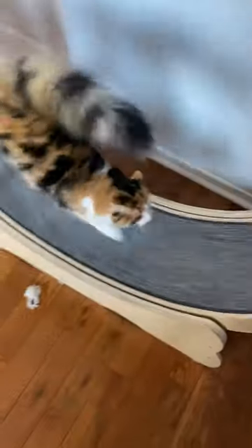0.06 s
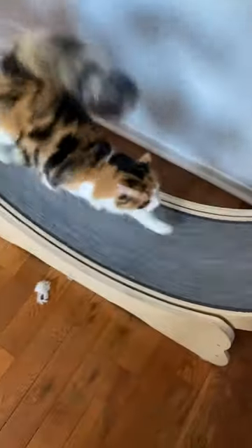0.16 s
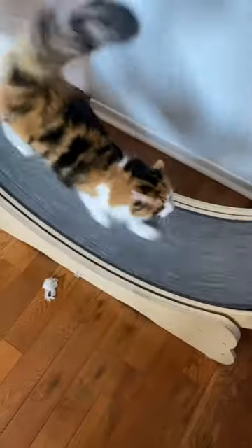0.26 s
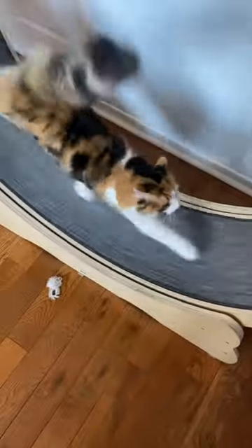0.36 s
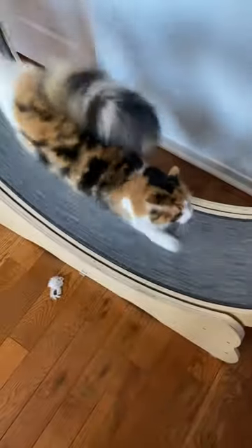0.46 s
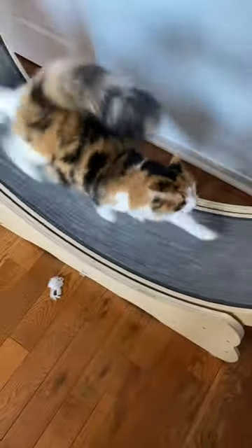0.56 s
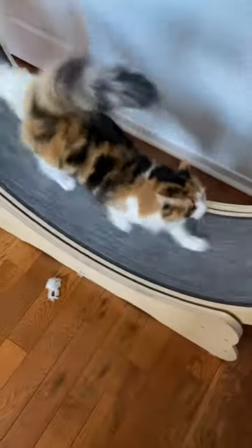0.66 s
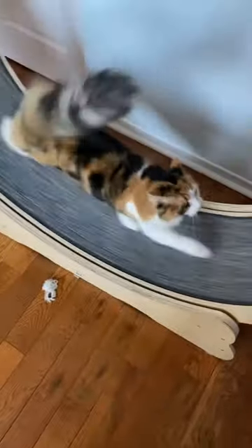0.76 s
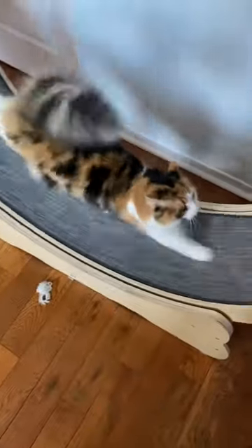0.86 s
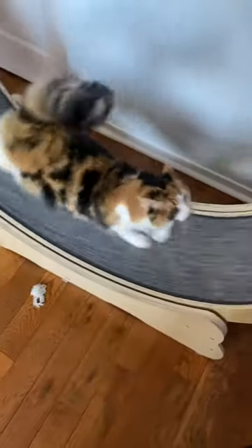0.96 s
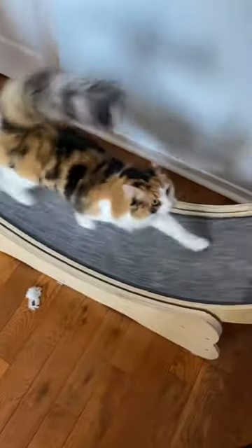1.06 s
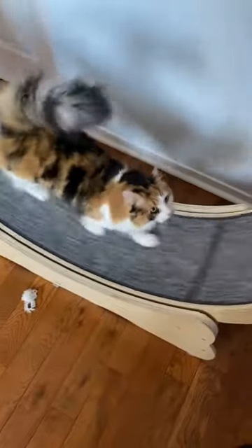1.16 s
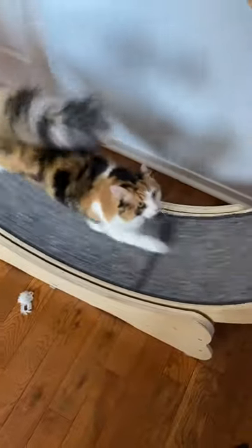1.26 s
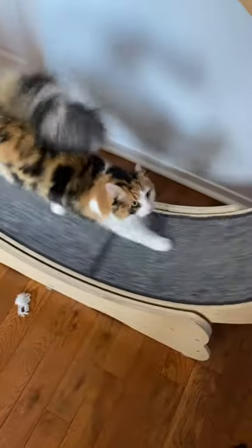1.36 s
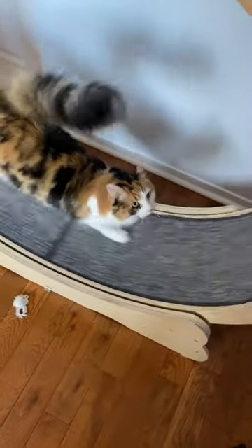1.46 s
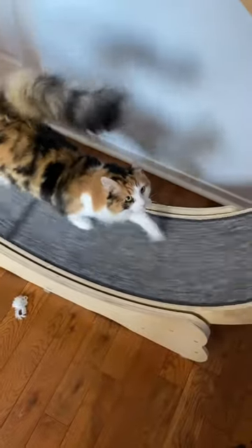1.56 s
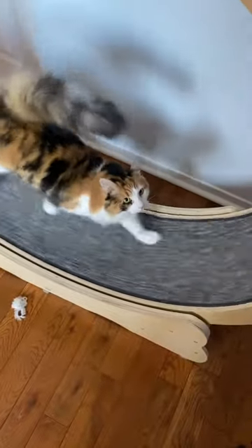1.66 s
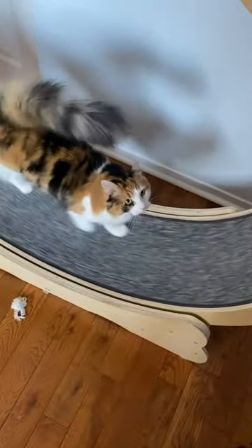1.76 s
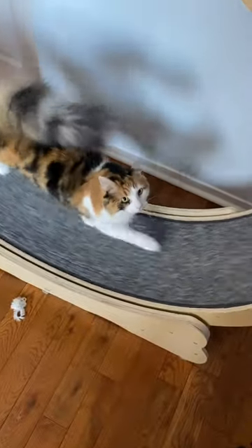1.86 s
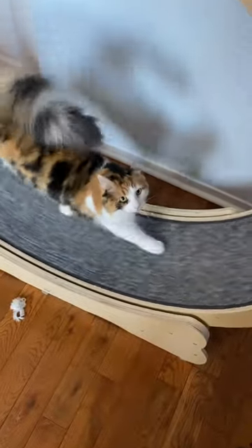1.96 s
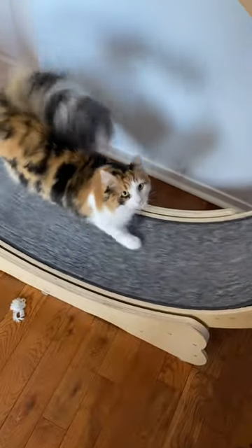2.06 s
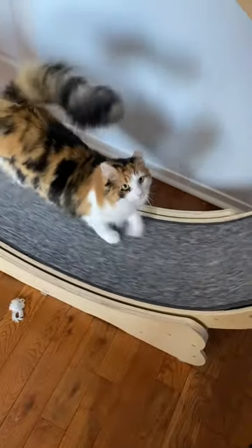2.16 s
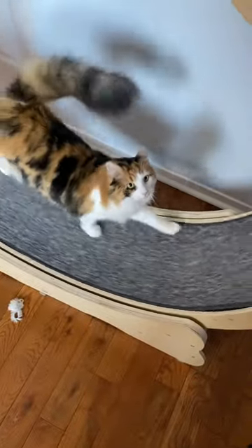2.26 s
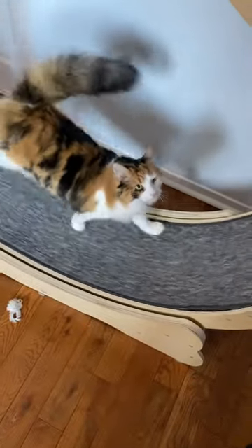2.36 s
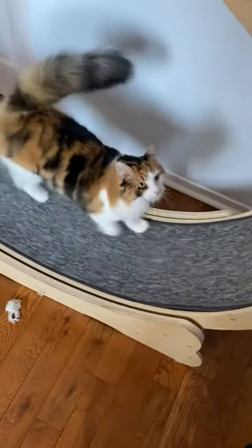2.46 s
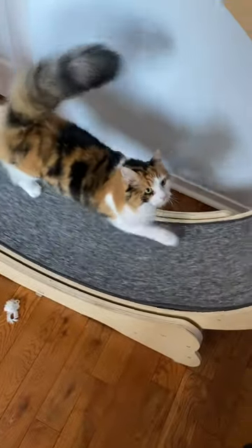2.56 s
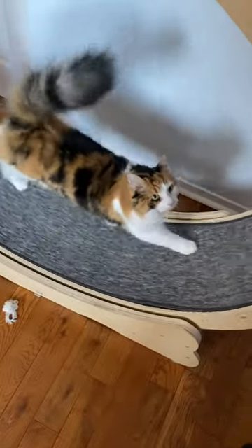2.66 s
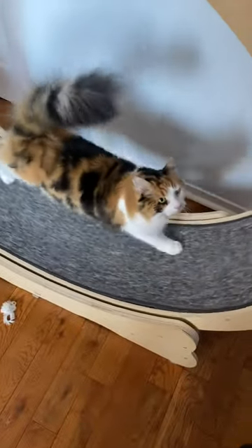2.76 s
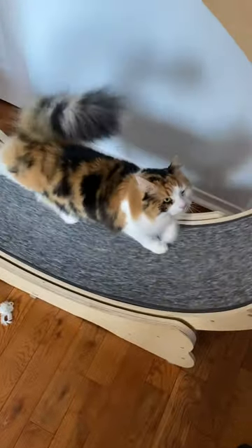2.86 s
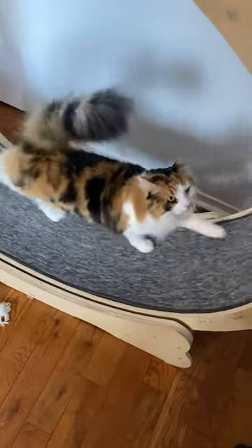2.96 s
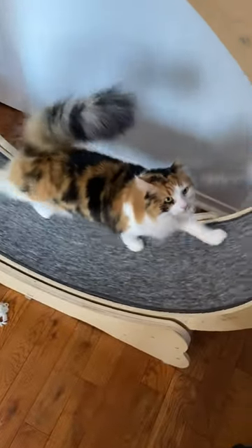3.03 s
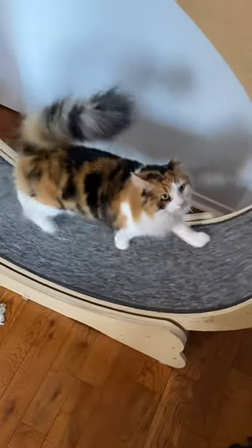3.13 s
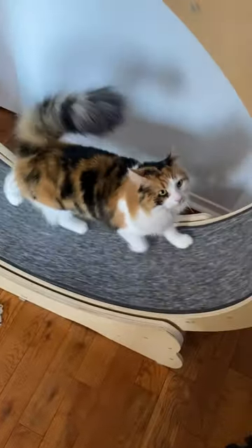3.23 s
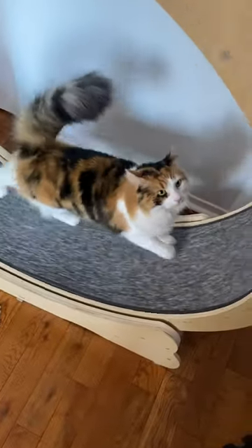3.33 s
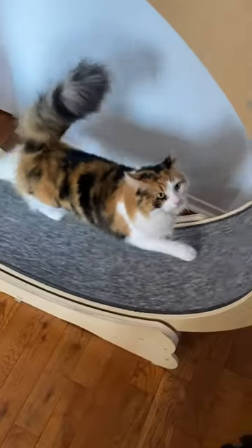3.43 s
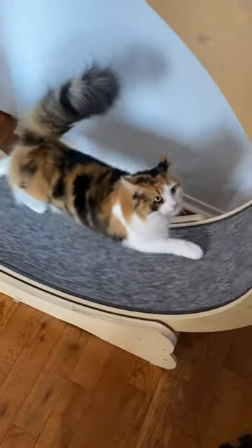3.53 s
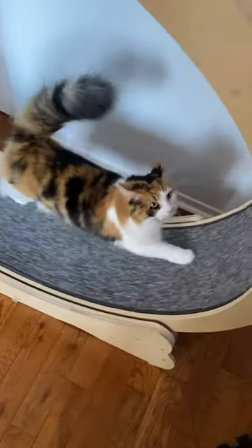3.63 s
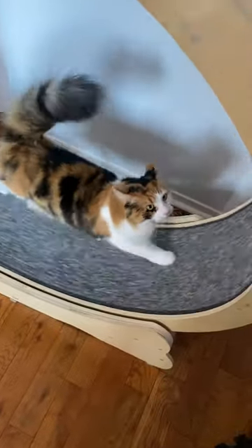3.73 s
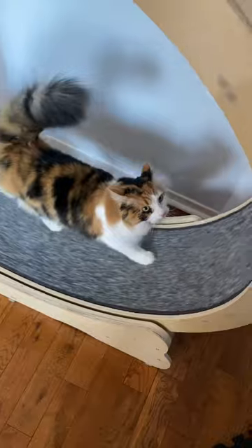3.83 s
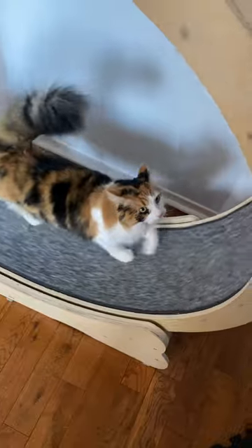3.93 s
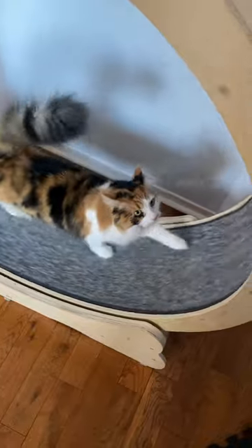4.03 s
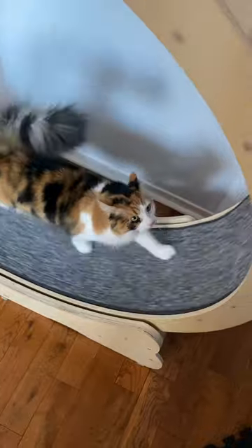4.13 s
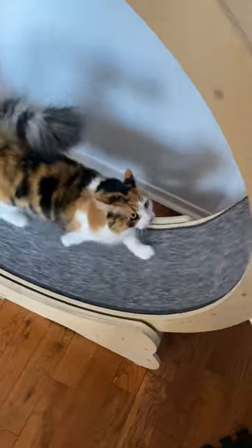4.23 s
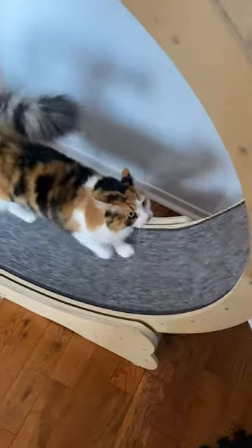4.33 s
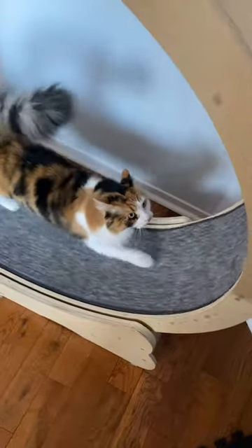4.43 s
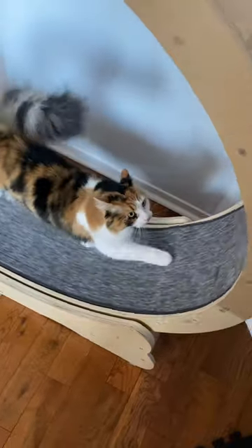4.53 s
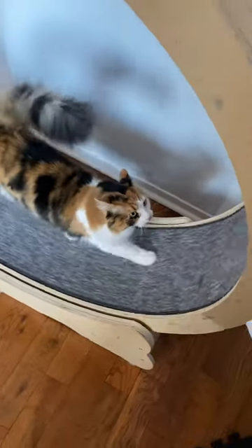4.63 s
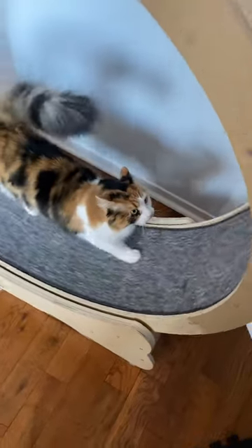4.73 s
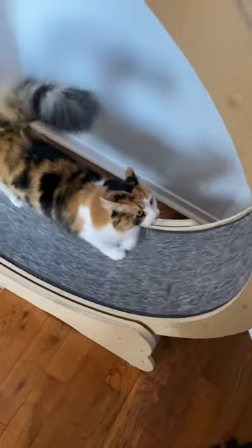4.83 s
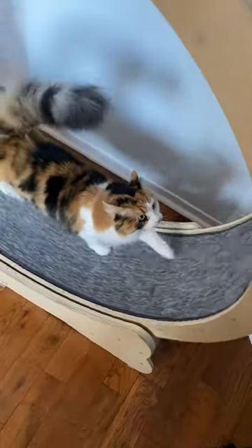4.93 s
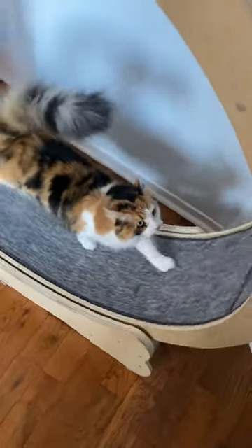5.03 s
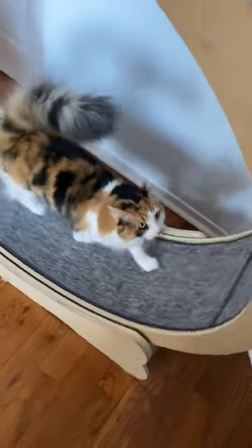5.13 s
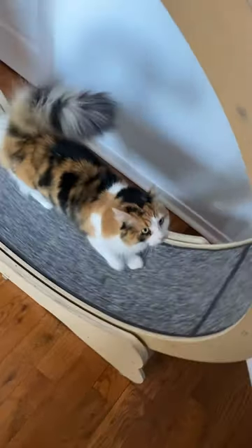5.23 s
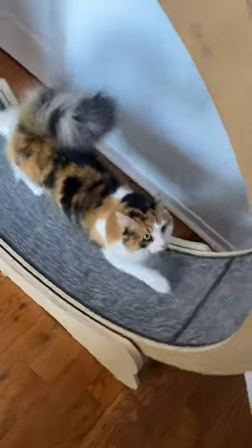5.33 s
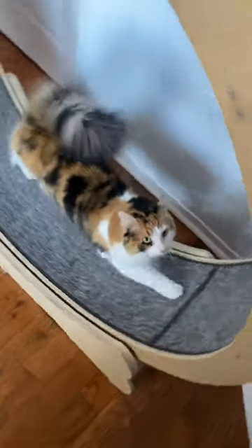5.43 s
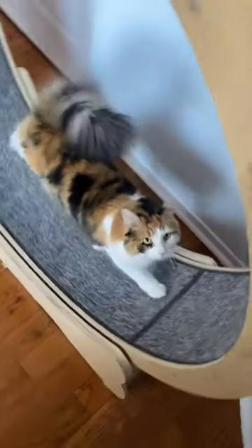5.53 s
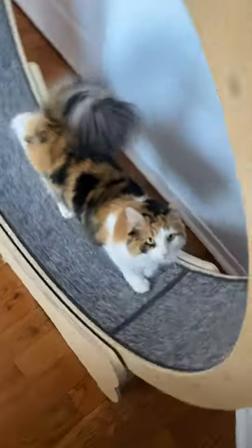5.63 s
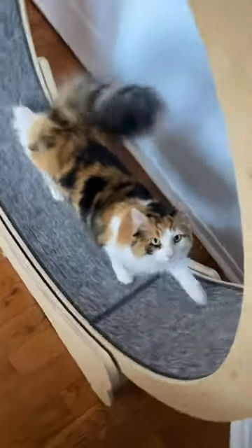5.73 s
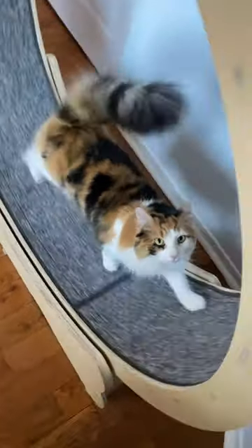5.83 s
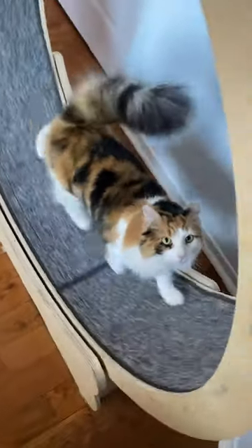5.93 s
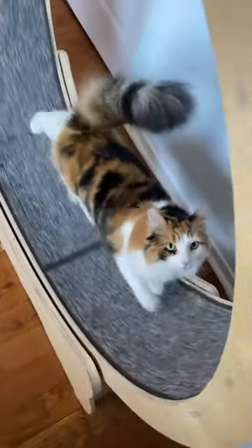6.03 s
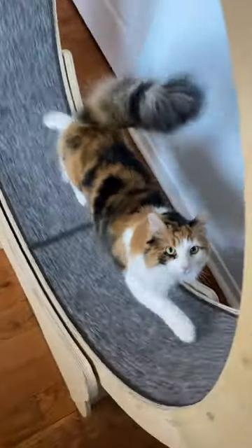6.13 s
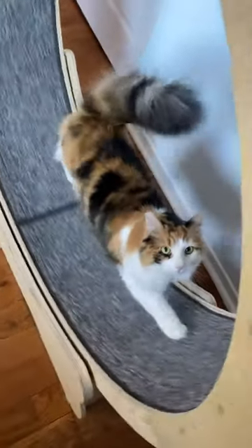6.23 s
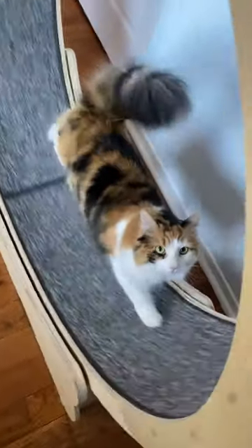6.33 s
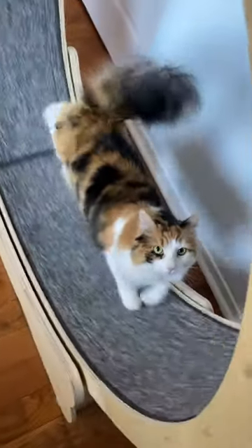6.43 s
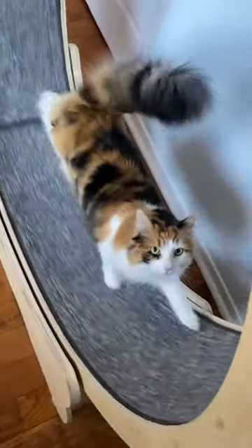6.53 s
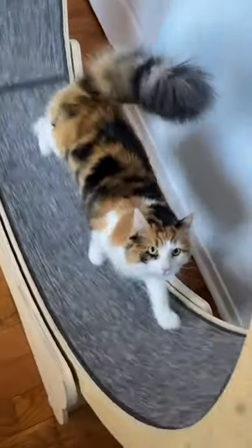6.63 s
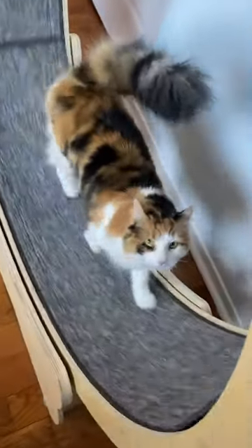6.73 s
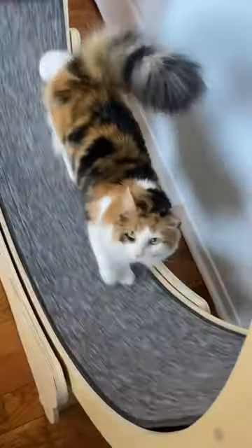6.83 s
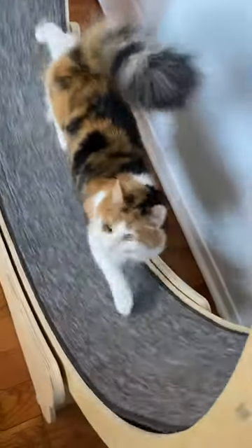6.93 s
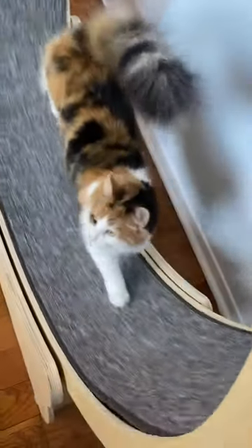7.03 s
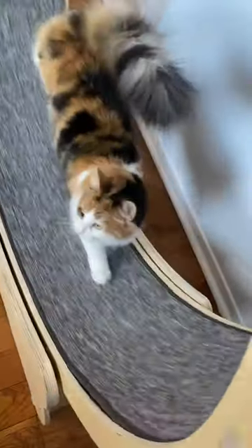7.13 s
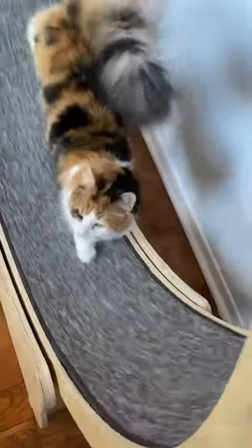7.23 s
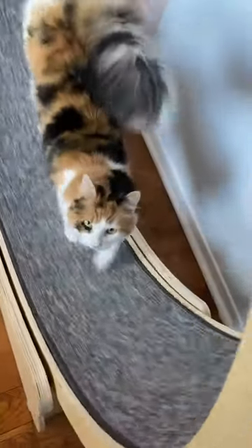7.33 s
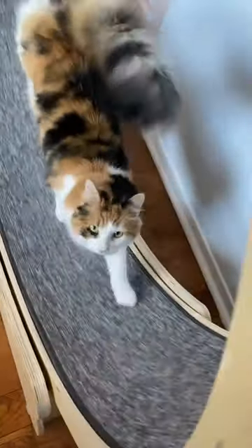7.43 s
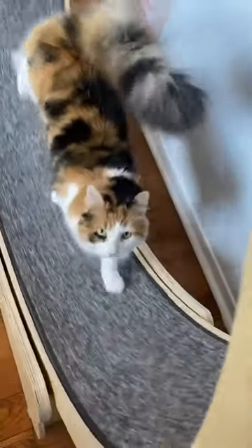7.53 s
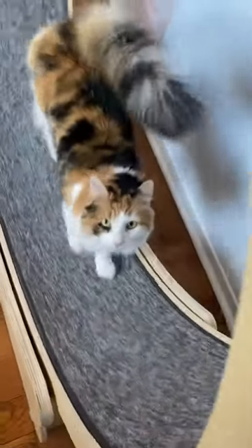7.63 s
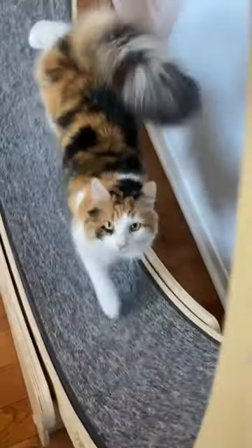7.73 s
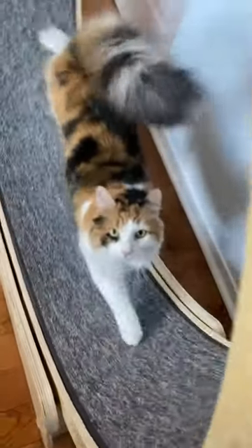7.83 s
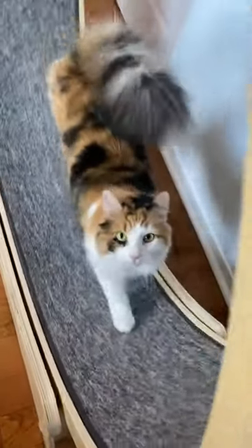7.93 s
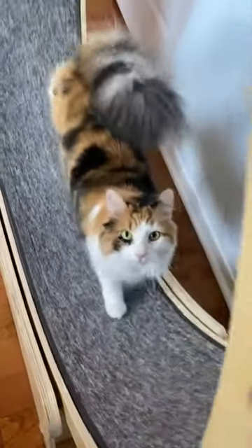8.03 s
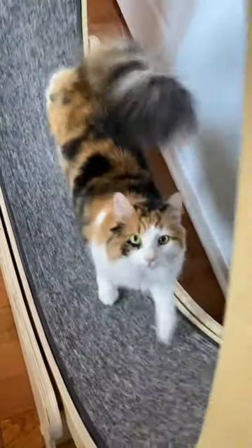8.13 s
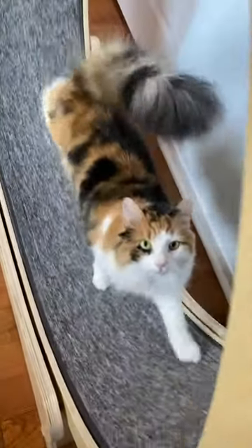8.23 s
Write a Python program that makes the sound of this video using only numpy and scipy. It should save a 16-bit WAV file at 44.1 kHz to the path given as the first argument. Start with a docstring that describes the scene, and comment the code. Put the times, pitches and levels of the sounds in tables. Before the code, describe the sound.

In a small room, close in stereo, a carpeted wooden wheel starts at full speed under a running cat: loud deep rumble, growling rollers, gritty rubbing, rapid padded thumps, short paw rasps and hollow rattling knocks. From about 0.3 s the roll gradually weakens, with strong thumps until 1.4 s, then falls steeply by 2 s. Around 2.4-3.4 s it is nearly still, with only faint rolling, light carpet brushes and small dry claw and wood ticks, clustered near 2.6-2.7 s. From 3.7 s a soft, steady walking roll returns with brushing paws, woody ticks and occasional low thumps, notably near 4.5, 5.3 and 6.1 s. The rumble grows moderately from 6 to 7 s, with rubbing swelling near 7 s and small rasps and faint wavering squeaks until about 7.4 s. A dull thump comes near 7.4 s, then the roll subsides to soft movement and sparse ticks by 8.3 s.

```python
"""A carpeted wooden exercise wheel rumbles as a cat runs in it, slows almost to a stop, then walks on.
The pace sets how loud the rumble, growl, rub and grit of the rim on its rollers are: noise shaped by the frame.
Paws thump (short swings), brush and scrape (bursts of noise) on a carpet that rustles in small grains.
The rim knocks, claws and loose parts tick, and the wood rings on in fading tones.
A close pair of microphone ports hears it all in a small room with a short tail."""
import sys
import numpy as np
from scipy import signal
from scipy.fft import rfft, irfft, next_fast_len
from scipy.io import wavfile
from scipy.ndimage import uniform_filter1d

SR = 44100
rng = np.random.default_rng(int(sys.argv[2]) if len(sys.argv) > 2 else 0)


def persist_wave(psi):
    """Save psi, clipped to +-1, as 16-bit WAV."""
    counts = np.round(np.clip(psi, -1, 1) * 32767).astype(np.int16)
    wavfile.write(sys.argv[1], SR, np.atleast_2d(counts).T)


N = 365148
HZ = np.fft.rfftfreq(N, 1 / SR)
TIME = np.arange(N) / SR
# the stretch of time in which one short sound is built
SHORT_TIME = TIME[:8192]
SHORT_HZ = np.fft.rfftfreq(8192, 1 / SR)


def gain_of(db):
    """Turns decibels into amplitude."""
    return 10 ** (np.asarray(db) / 20)


def evened(x):
    """Scales a sound to an average strength (rms) of 1."""
    return x / np.sqrt(np.mean(x ** 2) + 1e-20)


def packed(db, sound):
    """Sets the strength of a short sound: its rms if all its energy fell into 3 ms."""
    return gain_of(db) * sound / np.sqrt(np.sum(sound[0] ** 2) / (0.003 * SR))


def read(points, hz, axis=1):
    """Reads one column of a table, joined by straight lines over log frequency."""
    columns = np.transpose(points)
    return np.interp(np.log(hz + 1), np.log(columns[0] + 1), columns[axis])


def add(mix, s, sound):
    """Mixes a two-row sound in at time s."""
    part = mix[:, max(round(s * SR), 0):][:, :sound.shape[1]]
    part += sound[:, :part.shape[1]]


def ring(x, colour_db):
    """Filters a sound so that its colour rings after each blow, never before it."""
    log_gain = np.log(gain_of(np.r_[colour_db, colour_db[-2:0:-1]]))
    response = np.exp(np.conj(signal.hilbert(log_gain)))[:len(colour_db)]
    return irfft(rfft(x) * response, x.shape[-1])


def waver(per_s):
    """Wanders smoothly by chance, faster for a larger per_s, with rms 1."""
    return evened(irfft(rfft(rng.standard_normal(N)) * np.exp(-(HZ / per_s) ** 2), N))


def contact(per_s, spread_db, smooth):
    """Makes rolling contact: separate bumps of uneven size over a smooth rush."""
    bumps = rng.random(N) < per_s / SR
    rush = rng.standard_normal((2, N))
    size = rng.standard_normal((2, N))[:, bumps]
    jolts = np.zeros((2, N))
    jolts[:, bumps] = np.sign(size) * gain_of(spread_db * np.minimum(size ** 2, 2.5))
    return evened(evened(jolts) + smooth * rush)


# resonances of wheel and frame: f/Hz, width/Hz, level above the rest/dB
FRAME_RESONANCES = [(46.3, 0.69, 11), (82, 14.8, 6.5), (125, 15, 1.5), (144.1, 9.1, 7), (178.3, 7.3, 5.5),
                    (227.7, 2, 6.5), (296.3, 92, 5.5), (468, 39, 4), (610.5, 7.4, 5), (625, 74, 2.5),
                    (943, 9.1, 6.5), (1890, 19, 7)]


def frame_db(hz):
    """Gives the peaks that wheel and frame put on whatever shakes them."""
    return sum(db / (1 + (2 * (hz - f) / width) ** 2) for f, width, db in FRAME_RESONANCES)


# how long the room takes to fade by 60 dB: f/Hz, fade time t/s
ROOM_FADE = [(100, 0.4), (500, 0.41), (2000, 0.58), (6000, 0.23), (12000, 0.16)]


def room(x):
    """Adds a diffuse tail of energy 1: random echoes, each band dying at its own speed."""
    echoes = rng.standard_normal((2, SR // 2)) * (1 - np.exp(-TIME[:SR // 2] / 0.012))
    hz, t, bands = signal.stft(echoes, SR, nperseg=256)
    fade_db = -60 * t / read(ROOM_FADE, hz)[:, None]
    tail = signal.istft(bands * gain_of(fade_db), SR, nperseg=256)[1]
    return signal.fftconvolve(x, tail / np.linalg.norm(tail[0]), axes=1)[:, :N]


# the pace of the wheel, as the level of its rumble: t/s, level/dB
WHEEL_PACE = [(0.0, -20.5), (0.11, -21), (0.2, -23), (0.32, -22), (0.44, -23), (0.53, -23.5), (0.62, -23.5),
              (0.93, -25.5), (1.35, -27.5), (1.6, -31.5), (1.9, -35), (2.04, -39.5), (2.42, -48),
              (2.8, -49.5), (3.08, -52.5), (3.45, -46.5), (3.7, -42.5), (4.1, -42), (5.0, -42), (5.75, -42),
              (6.2, -37.5), (6.7, -35), (7.1, -40), (7.43, -37.5), (7.75, -44), (8.05, -46.5), (8.28, -45)]
WALK_DB, RUN_DB = -40.5, -20.5  # the pace at a walk and at a full run
TROT_DB = -36  # above this pace the rumble turns from its slow colour to its fast one


def pace(s):
    """Tells how hard the wheel turns at time s, in dB above a walk."""
    return np.interp(s, *np.transpose(WHEEL_PACE)) - WALK_DB


LOAD_DB, LOAD_S = 0.5, 0.0084  # each thump presses the rim onto its rollers for a moment


def footfall_load():
    """Gives the brief rise in rolling noise under each thump, in dB."""
    since = (np.clip((TIME - row[0]) / LOAD_S, 0, 20) for row in THUMPS)
    return LOAD_DB * sum(u * np.exp(1 - u) for u in since)


# colours of the rolling sounds, before the frame's resonances; each table: f/Hz, relative level/dB
# rumble when the wheel spins fast, and when it creeps
FAST_RUMBLE_COLOUR = [(25, -3), (45, -23), (80, -9), (150, 1.5), (215, 4), (265, -9), (400, -10.5),
                      (700, -31), (2000, -57)]
SLOW_RUMBLE_COLOUR = [(25, -40.5), (45, -1), (85, -1), (120, -5), (175, -3.5), (270, -10), (370, -29),
                      (700, -16.5), (2000, -102)]
# growl of the rollers, rim rubbing on them, grit under them
GROWL_COLOUR = [(150, -19.5), (300, -1.5), (470, 0.5), (640, -5), (820, -17.5), (1300, -27), (2500, -65),
                (12000, -100)]
RUB_COLOUR = [(350, -3.5), (700, 0), (1000, 3.5), (1750, -1.5), (2300, -10.5), (3300, -20.5), (6000, -89.5)]
GRIT_COLOUR = [(1200, 3), (2600, 13.5), (3700, 6.5), (4700, 4.5), (5700, -0.5), (6600, 2), (7600, -2.5),
               (10000, -4.5), (14000, -44)]
# steady whirr of the roller bearings
WHIRR_COLOUR = [(40, 3), (90, 1.5), (300, 0.5), (430, 8.5), (600, 8.5), (1000, -5), (2000, -32),
                (4000, -19), (9000, -85)]
# each sound of the rim: its level at a walk (dB), and the dB it gains per dB of pace
GROWL_DB, GROWL_SLOPE = -51.5, 0.53
RUB_DB, RUB_SLOPE = -52.5, 0.78
GRIT_DB, GRIT_SLOPE = -65, 1.256
CHATTER_FROM_DB, CHATTER_SLOPE = -27, 3.14  # near a full run the rollers chatter: the growl climbs faster
SWELL_S, SWELL_WIDTH_S, SWELL_DB = 6.99, 0.37, 4  # the rubbing swells once


def rolling():
    """Rolls the rim over the rollers: a harder pace is louder, and its rumble takes on the fast colour."""
    pace_db = pace(TIME)
    rumble_db = WALK_DB + pace_db
    chatter_db = CHATTER_SLOPE * np.maximum(rumble_db - CHATTER_FROM_DB, 0)
    growl_db = GROWL_DB + GROWL_SLOPE * pace_db + chatter_db
    swell_db = SWELL_DB * np.exp(-((TIME - SWELL_S) / SWELL_WIDTH_S) ** 2)
    rub_db = RUB_DB + RUB_SLOPE * pace_db + swell_db
    grit_db = GRIT_DB + GRIT_SLOPE * pace_db
    # 0 up to a trot, 1 at a full run
    speed = np.clip((rumble_db - TROT_DB) / (RUN_DB - TROT_DB), 0, 1)
    body_db = frame_db(HZ)

    def coloured(x, colour):
        return evened(ring(x, read(colour, HZ) + body_db))

    bumps = contact(per_s=90, spread_db=1.5, smooth=1.39)
    fast, slow = coloured(bumps, FAST_RUMBLE_COLOUR), coloured(bumps, SLOW_RUMBLE_COLOUR)
    unsteady_db = (1.05 + 0.22 * (3.5 - speed)) * waver(per_s=3.8)
    rumble = (speed * fast + (1 - speed) * slow) * gain_of(rumble_db + unsteady_db)
    growl = coloured(contact(per_s=70, spread_db=0.5, smooth=1.0), GROWL_COLOUR)
    growl = growl * gain_of(growl_db + 2.88 * waver(per_s=11.7))
    rub = coloured(contact(per_s=92, spread_db=0.5, smooth=9.3), RUB_COLOUR)
    rub = rub * gain_of(rub_db + 1.06 * waver(per_s=104))
    grit = coloured(contact(per_s=710, spread_db=-17.0, smooth=3.5), GRIT_COLOUR) * gain_of(grit_db)
    whirr = gain_of(-55.5) * coloured(rng.standard_normal((2, N)), WHIRR_COLOUR)
    # the load on the rollers shifts under the cat; at a walk the grit comes in spurts
    pressure_db = footfall_load() + 1.0 * waver(per_s=46)
    spurts_db = 3.54 * (1 - speed) * waver(per_s=36)
    return rumble + whirr + (growl + rub + grit * gain_of(spurts_db)) * gain_of(pressure_db)


# colour of the carpet's rustle: f/Hz, relative level/dB
RUSTLE_COLOUR = [(200, -14), (480, 2.5), (850, -1), (1400, 1), (2600, -4), (5000, -15), (12000, -41)]
RUSTLE_DB, RUSTLE_SLOPE = -60.5, 1  # level at a walk, dB gained per dB of pace


def rustle():
    """Crackles the carpet pile under the shifting weight, in small irregular grains."""
    crackle = contact(per_s=55, spread_db=7.0, smooth=0.3)
    grains = ring(crackle, read(RUSTLE_COLOUR, HZ) + frame_db(HZ))
    level_db = RUSTLE_DB + RUSTLE_SLOPE * np.minimum(pace(TIME), 6)  # no louder above 6 dB of pace
    return evened(grains + gain_of(3) * room(grains)) * gain_of(level_db)


# paws and rim joints bumping the wheel:
# t/s, swing level/dB, pitch f/Hz, swell time t/s, peak level of the wooden knock against the swing/dB
THUMPS = [(0.002, -14.5, 177, 0.0066, -3), (0.101, -16, 219, 0.018, -3.5), (0.265, -12.5, 187, 0.0064, -2),
          (0.305, -24.5, 112, 0.0079, 4), (0.471, -24.5, 160, 0.0049, 4.5), (0.53, -14, 117, 0.0039, -8),
          (0.769, -11.5, 150, 0.0081, -6.5), (0.885, -18, 150, 0.0091, -3.5),
          (0.949, -19.5, 170, 0.011, -7), (1.044, -11, 196, 0.0092, -0.5), (1.225, -32, 143, 0.007, -5),
          (1.371, -13.5, 152.3, 0.022, 0), (1.706, -30.5, 89.5, 0.016, 2), (1.807, -26.5, 128.5, 0.017, -4),
          (1.923, -40, 134, 0.017, 5), (2.647, -28, 177, 0.0072, -13), (3.704, -31, 190, 0.025, 0.5),
          (4.469, -19, 92, 0.0068, -15.5), (4.549, -34, 164, 0.0075, -1), (4.82, -33.5, 148, 0.0078, -10),
          (5.333, -15.5, 114, 0.0062, -20), (5.372, -31, 152, 0.015, -19), (6.104, -17, 83, 0.0055, -5.5),
          (6.744, -25.5, 93.5, 0.013, 1.5), (7.384, -24.5, 93, 0.012, -1), (7.82, -34, 92, 0.016, -9)]
# colour of that wooden knock: f/Hz, relative level/dB
THUMP_KNOCK_COLOUR = [(40, -27.5), (90, 11.5), (200, -3.5), (320, -7.5), (500, -10), (750, -10.5),
                      (1200, -35), (3000, -42), (9000, -76)]


def thumps():
    """Swings the wheel for a few cycles with each padded blow, and knocks on the wood."""
    t = SHORT_TIME
    wood_db = read(THUMP_KNOCK_COLOUR, SHORT_HZ) + frame_db(SHORT_HZ)
    out = np.zeros((2, N))
    for s, db, pitch_hz, swell, knock_db in THUMPS:
        u = t / swell
        swing = (u * np.exp(1 - u)) ** 2 * -np.sin(2 * np.pi * pitch_hz * t)
        swing = swing * np.array([[1], [0]])  # only in the row shared by both ports
        knock = ring(rng.standard_normal((2, len(t))) * np.exp(-t / 0.055), wood_db)
        knock = gain_of(knock_db) * knock / abs(knock).max()
        add(out, s, gain_of(db) * (swing + knock))
    return out + gain_of(-15.0) * room(out)


# paws dragging, with a rasp or a small squeak:
# t/s, length t/s, rms level/dB, ring f/Hz, width of each of two ring stages/Hz, share by which the ring falls
SCRAPES = [(0.058, 0.026, -34, 1483, 1500, .1), (0.098, 0.031, -39, 1400, 1200, 0.11),
           (0.283, 0.021, -36, 1300, 1400, .1), (0.485, 0.04, -43, 1373, 1290, .1),
           (0.756, 0.021, -36.5, 1120, 500, 0.081), (0.956, 0.022, -38, 1730, 1100, 0.11),
           (6.131, 0.023, -51, 1894, 350, 0.12), (6.175, 0.039, -42.5, 1344, 1200, 0.12),
           (6.854, 0.077, -51, 2050, 900, 0.064), (6.908, 0.049, -47, 1680, 90, 0.15),
           (6.922, 0.052, -47.5, 930, 350, 0.11), (7.005, 0.061, -50.5, 1640, 50, 0.027),
           (7.007, 0.056, -55, 1330, 250, 0.034), (7.105, 0.04, -55, 1640, 150, 0.06),
           (7.195, 0.035, -54, 1320, 150, .03), (7.345, 0.06, -52.5, 1680, 70, 0.0041),
           (7.352, 0.029, -46, 1300, 69.6, 0.05), (7.356, 0.056, -61, 1350, 1500, 0.082),
           (7.442, 0.067, -64, 1750, 1500, 0.038)]
SCRAPE_ROUGH_DB = 2  # how unevenly the paw catches in the pile
SCRAPE_WAVER = 0.015  # share by which the ring wavers as the pad slips


def scrapes():
    """Drags a paw that sticks and slips: a rasp when its ring is wide, a wavering squeak when narrow."""
    out = np.zeros((2, N))
    for s, length, db, ring_hz, width_hz, sag in SCRAPES:
        size = round(length * SR)
        decay = np.exp(-np.pi * width_hz / SR)
        real, imaginary, (grip, drift) = rng.standard_normal((3, 2, 8192))
        catches = gain_of(SCRAPE_ROUGH_DB * evened(uniform_filter1d(grip, size=200)))
        fuzz = signal.lfilter([1], np.poly([decay, decay]), real + 1j * imaginary)
        fuzz = (fuzz * catches)[:, -size:]
        slips = SCRAPE_WAVER * evened(uniform_filter1d(drift, size=300))[:size]
        hz = ring_hz * (np.linspace(1, 1 - sag, size) + slips)
        turn = np.exp(2j * np.pi * np.cumsum(hz) / SR)  # moves the fuzz up to the ring's pitch
        drag = (fuzz * turn).real * signal.windows.tukey(size, .5)
        add(out, s, gain_of(db) * evened(drag))
    return out + gain_of(-12) * room(out)


# hollow knocks of the rim on its rollers: t/s, strength level/dB, panel resonance f/Hz
RIM_KNOCKS = [(0.065, -14.5, 573), (0.108, -21, 457), (0.292, -18.5, 367), (0.333, -17, 444),
              (0.472, -16.5, 465), (0.515, -24, 766), (0.76, -21, 494), (0.807, -23, 423), (0.93, -28, 466),
              (1.062, -22.5, 490), (1.112, -33, 394), (1.364, -17.5, 352), (1.712, -24, 437),
              (1.955, -28.5, 514), (2.947, -43, 670), (3.701, -49, 520), (3.974, -31, 485),
              (4.468, -31.5, 346), (4.73, -33.5, 300), (4.819, -31.5, 278), (5.135, -37.5, 580),
              (5.325, -33, 298), (6.325, -34, 730), (6.624, -41, 397), (6.85, -38, 905)]
KNOCK_S, PANEL_DB_PER_OCTAVE = 0.015, 21.5  # how fast a knock dies; its fall away from the resonance


def knocks():
    """Jolts the rim on a roller, and a panel of the wheel answers with a hollow, rattling ring."""
    out = np.zeros((2, N))
    for s, db, panel_hz in RIM_KNOCKS:
        octaves = abs(np.log2((SHORT_HZ + 1) / panel_hz))
        panel_db = np.maximum(-PANEL_DB_PER_OCTAVE * octaves, -80) + frame_db(SHORT_HZ)
        jolt = rng.standard_normal((2, len(SHORT_TIME))) * np.exp(-SHORT_TIME / KNOCK_S)
        add(out, s, packed(db, ring(jolt, panel_db)))
    return out + gain_of(-8.5) * room(out)


# colour of a touch, before hardness and frame: f/Hz, relative level/dB
TOUCH_COLOUR = [(120, 6.5), (350, 2.5), (1000, 1.5), (2600, 4.5), (4000, 3.5), (5500, 3), (7200, 1),
                (10500, -1), (14000, -35)]
CRACK_S = 0.0012  # how fast the snap itself dies
REBOUND_DB, REBOUND_S = -12, 0.007  # a claw catches again just after its snap; chance varies this delay
GRAINS_PER_S, GRAIN_DB = 150, 0.5  # single loops of the pile snapping free, against the smooth part of a scuff
ECHO_DB, ECHO_S, ECHO_TREBLE_S = -4, 0.06, 0.023  # the room after a touch: level, decay, treble decay
# low part and top of a touch of hardness 0; dB of low part lost per dB of hardness
WOODY_DB, SHARP_DB, WOODY_LOSS = 7, -8, 0.63


def touch(db, ring_hz, hard_db, scuff_db, scuff_s):
    """Snaps one spot of the wood, scuffs over the pile in grains, and lets the room answer."""
    t, hz = SHORT_TIME, SHORT_HZ
    low, top = 1 / (1 + (hz / 2000) ** 4), 1 - 1 / (1 + (hz / 5500) ** 6)
    crack_shape = t * np.exp(-t / CRACK_S)
    rebound_s = REBOUND_S * rng.uniform(0.49, 1.34)
    crack_shape = crack_shape + gain_of(REBOUND_DB) * np.interp(t - rebound_s, t, crack_shape)
    snap, fibres, echoes = rng.standard_normal((3, 2, len(t)))

    treble = irfft(rfft(echoes) * top)
    tail = (echoes - treble) * np.exp(-t / ECHO_S) + treble * np.exp(-t / ECHO_TREBLE_S)
    fade_in_and_out = (1 - np.exp(-t / 0.0013)) * (1 - (t / t[-1]) ** 4)
    tail = gain_of(ECHO_DB) * evened(tail * fade_in_and_out)

    clumps = evened(uniform_filter1d(rng.standard_normal(len(t)), size=90))  # fibres let go in tufts
    loops = (rng.random(len(t)) < GRAINS_PER_S / SR) * rng.random(len(t))
    loops = uniform_filter1d(loops, size=24)
    grain = evened(gain_of(1.7 * clumps)) + gain_of(GRAIN_DB) * evened(loops)
    scuff = gain_of(scuff_db) * evened(fibres * grain * t * np.exp(-t / scuff_s))

    spot_db = 4 / (1 + ((hz - ring_hz) / (0.2 * ring_hz)) ** 2)
    # each spot has its own small modes
    unevenness = evened(uniform_filter1d(rng.standard_normal(len(hz)), size=50))
    modes_db = 3 / (1 + (hz / 4000) ** 4) * unevenness
    blow = evened(evened(ring(snap * crack_shape, spot_db + modes_db)) + scuff) + tail
    tilt_db = low * (WOODY_DB - WOODY_LOSS * hard_db) + top * (SHARP_DB + hard_db)
    return packed(db, ring(blow, read(TOUCH_COLOUR, hz) + frame_db(hz) + tilt_db))


# modes of the wooden shell: f/Hz, relative level/dB, time to fade by 60 dB t/s
WOOD_MODES = [(959, -4, 0.15), (1228, 0.5, 0.16), (1470, 3, 0.042), (1806, -1.5, 0.11), (1966, 6.5, 0.031),
              (2463, 3.5, 0.04), (2700, -4, 0.065), (3370, 1, 0.032)]
SPOT_DB_PER_OCTAVE = 11  # modes far from the struck spot's resonance ring less


def wood_ring(db, ring_hz):
    """Rings the wooden shell after a tick, most in the modes near the struck spot's resonance."""
    t = SHORT_TIME
    detune = 1 + 0.013 * rng.standard_normal()
    sound = np.zeros((2, len(t)))
    for hz, mode_db, t60 in WOOD_MODES:
        level_db = mode_db - SPOT_DB_PER_OCTAVE * abs(np.log2(hz / ring_hz)) - 60 * t / t60
        sound += gain_of(level_db) * np.sin(2 * np.pi * (hz * detune * t + rng.random((2, 1))))
    return packed(db, sound * (1 - np.exp(-t / 0.00024)))


# the clearest ticks of claws and loose parts: t/s, strength level/dB, resonance f/Hz,
# hardness/dB (woody below 0, sharp above), level of the wood's ring against the tick/dB
TICKS = [(0.081, -22.5, 1630, 2.5, -16), (0.47, -24.5, 1020, -37, -8), (0.535, -23.5, 920, 2, -23),
         (1.048, -21, 1220, -6, -15), (1.707, -32.5, 915, -4.5, -22), (1.809, -40, 1600, 6, -20),
         (1.833, -31.5, 2530, 3, -4), (1.864, -29.5, 2600, -0.5, -11), (1.911, -47, 1300, -12, -8),
         (1.951, -38.5, 1400, -8, -3), (1.999, -41.5, 1500, 2, -20), (2.029, -39, 1500, -1, -21),
         (2.149, -47, 5200, 3, -21), (2.195, -47, 2000, 5, -18), (2.403, -47, 2620, 2.5, -12),
         (2.56, -54, 2500, 2, -15), (2.59, -40.5, 1900, 4, -23), (2.617, -31.5, 1000, -3, -7),
         (2.625, -41, 1000, -4, -14), (2.685, -33.5, 950, 1, -3.5), (2.689, -36, 3330, -2, -7),
         (2.719, -43, 5000, 0, -18), (2.813, -41.5, 1445, 2.5, -20), (2.864, -54, 2090, 14, -20),
         (2.947, -40.5, 2620, -7, -13), (3.15, -48, 953, -27, -2), (3.194, -44.5, 1050, 1.5, -20),
         (3.244, -49, 1500, -5, -13), (3.542, -46, 2000, -11, -15), (3.644, -44, 5100, 2.5, -20),
         (3.709, -44.5, 1910, 7, -3), (3.971, -29.5, 1220, -7, -9), (4.137, -42, 982, 3.5, -23),
         (4.202, -41.5, 1010, 3.5, -12), (4.259, -44.5, 1000, 4, -18), (4.429, -41.5, 940, 7, -21),
         (4.771, -55, 1800, 18, -18), (4.816, -25.5, 1560, -1, -9), (4.872, -36, 1700, 6, -20),
         (4.89, -40, 1540, 2, -12), (4.955, -43, 2040, 10, -4), (5.136, -49, 2000, 3, -16),
         (5.177, -32.5, 2670, 4, -1), (5.199, -31, 2700, -25, -7), (5.39, -45, 2400, -3, -8),
         (5.502, -40, 2000, -2, -13), (5.619, -28.5, 1950, 8.5, -3), (5.847, -40.5, 2000, -1.5, -10),
         (5.9, -37.5, 890, 4, -21), (6.03, -36.5, 915, 8, -10), (6.125, -29.5, 1230, -45, -6.5),
         (6.201, -31.5, 1430, 5, -8), (6.324, -32, 1270, -10, 1.5), (6.617, -44.5, 1850, 8, 3.5),
         (6.64, -49, 2500, -1, 0), (6.761, -33.5, 2050, 5, 0.5), (6.789, -39.5, 1910, 6, 1),
         (6.82, -38, 1500, -3, -1), (6.869, -34.5, 1010, -1.5, -7), (7.343, -33, 1070, -11, -10),
         (7.434, -29.5, 965, -7, -5.5), (7.51, -39, 1400, -19, -10), (7.821, -39.5, 1060, -9, -10),
         (7.889, -45.5, 1300, -20, -4), (7.943, -44, 1300, -10, -12)]
TICK_SCUFF_DB, TICK_SCUFF_S = -12.5, 0.037  # the short scuff that follows a tick, against its snap
# faint ticks in between: how many a second, strength at a walk (dB), its spread (dB), dB gained per dB of pace
PATTER_PER_S, PATTER_DB, PATTER_SPREAD_DB, PATTER_SLOPE = 4.8, -51.5, 2, 0.39


def ticks():
    """Snaps claws and loose parts: clear ticks, and a faint patter that gets louder with the pace."""
    out = np.zeros((2, N))
    for s, db, ring_hz, hard_db, wood_db in TICKS:
        add(out, s, touch(db, ring_hz, hard_db, TICK_SCUFF_DB, TICK_SCUFF_S))
        add(out, s, wood_ring(db + wood_db, ring_hz))
    for k in range(int(PATTER_PER_S * N / SR)):
        s = (k + rng.random()) / PATTER_PER_S
        db = PATTER_DB + PATTER_SLOPE * pace(s) + PATTER_SPREAD_DB * rng.standard_normal()
        ring_hz, hard_db = rng.uniform(760, 1900), rng.uniform(-3, 2)
        add(out, s, touch(db, ring_hz, hard_db, TICK_SCUFF_DB, TICK_SCUFF_S))
    return out


# paws brushing the carpet as they push off: t/s, strength level/dB, hardness/dB
BRUSHES = [(1.937, -36.5, 2), (2.148, -46, 0), (2.247, -43, 6), (2.318, -42.5, 1), (2.454, -52, 1),
           (3.341, -46, 5), (3.649, -48, -4), (3.705, -38.5, 2.5), (3.868, -41.5, -4), (3.948, -37.5, -7),
           (4.02, -40, -5), (4.365, -41.5, -2), (4.468, -42, 5), (4.509, -37, -8), (4.707, -38.5, 4),
           (5.115, -39, 0), (5.273, -35.5, -1), (5.307, -41, 3), (5.325, -34, 0), (5.49, -42.5, 3.5),
           (5.596, -34.5, 2.5), (5.649, -35.5, 2.5), (5.782, -45, 3), (5.937, -42, 7), (6.126, -32, -2.5),
           (6.179, -42, 15), (6.264, -40, 14), (6.407, -47, 7), (7.069, -54, 13), (8.088, -50.5, 7)]
BRUSH_SCUFF_DB, BRUSH_S, BRUSH_HZ = 1, 0.022, 1240  # scuff against snap, its decay, the spot's resonance


def brushes():
    """Pushes a paw off, its pad and claws brushing through the pile."""
    out = np.zeros((2, N))
    for s, db, hard_db in BRUSHES:
        add(out, s, touch(db, BRUSH_HZ, hard_db, BRUSH_SCUFF_DB, BRUSH_S))
    return out


# the two ports: f/Hz, likeness 0-1, level of left over right/dB, lead of left/radians
PORTS = [(70, .98, -.2, 0), (150, .955, .6, .22), (300, .88, 2.4, .55), (580, .66, 3.8, 1.1),
         (1250, .5, 5.5, -.85), (2100, .55, 6.5, -.3), (2700, .68, 8.5, 1.0), (4200, .77, 7.5, .6),
         (5900, .82, 6, .8), (7060, .88, 2, -.6), (8450, .96, 0, -3.14), (9730, .9, 0, -6.0),
         (11000, .9, 0, -6.7), (12300, .85, 1, -8.2)]


def scene():
    """Sums the sources: row one reaches both ports, row two is the part only the right port hears."""
    size = next_fast_len(N + 4096)
    hz = np.fft.rfftfreq(size, 1 / SR)
    sources = rolling() + rustle() + thumps() + scrapes() + knocks() + ticks() + brushes()
    shared, apart = rfft(sources, size)
    same = np.clip(read(PORTS, hz, axis=1), 0, 1)
    balance_db, lead = read(PORTS, hz, axis=2), read(PORTS, hz, axis=3)
    right = same * shared + np.sqrt(1 - same ** 2) * apart
    right = right * np.exp(-1j * lead) / gain_of(balance_db)
    return irfft(np.array([shared, right]), size)[:, :N]


SHELF_HZ, EDGE_HZ = 11300, 15500  # where the top treble steps down, and where the sound ends


def record(dry):
    """Cuts the deep bass, steps the top treble down by 4.5 dB, and limits the band."""
    bass_cut = signal.butter(4, 37, "highpass", fs=SR, output="sos")
    lean = signal.sosfilt(bass_cut, dry)
    below_shelf = signal.firwin(511, SHELF_HZ, window=("kaiser", 9), fs=SR)
    below_edge = signal.firwin(511, EDGE_HZ, window=("kaiser", 9), fs=SR)
    treble_step = below_shelf + gain_of(-4.5) * (below_edge - below_shelf)
    return signal.oaconvolve(lean, treble_step[None], "same")


dry = scene()
out = record(dry)
persist_wave(out)
```